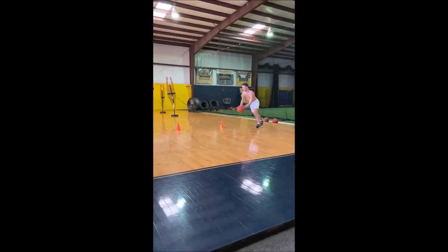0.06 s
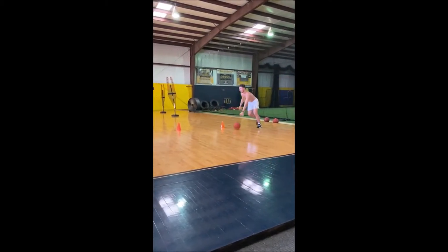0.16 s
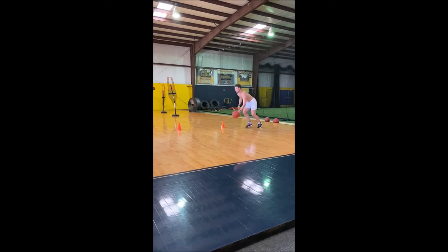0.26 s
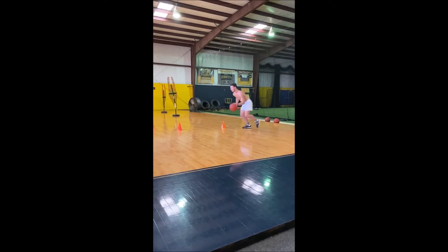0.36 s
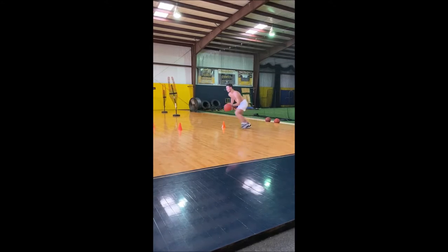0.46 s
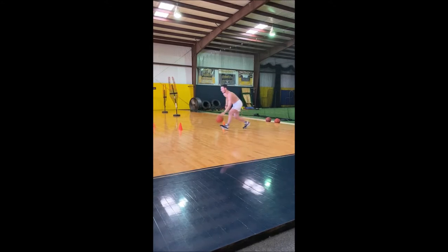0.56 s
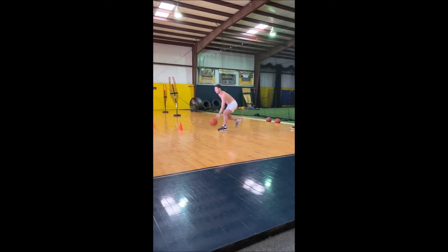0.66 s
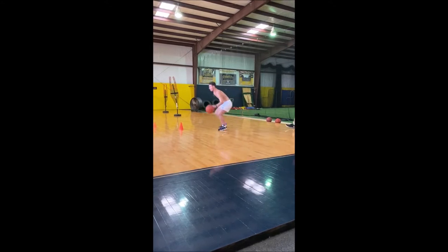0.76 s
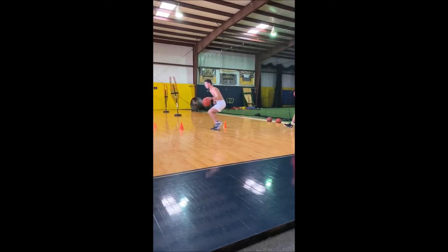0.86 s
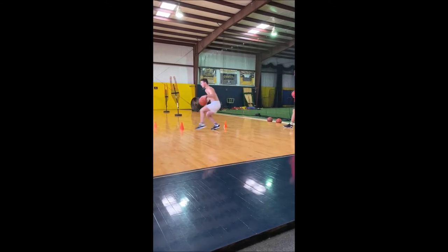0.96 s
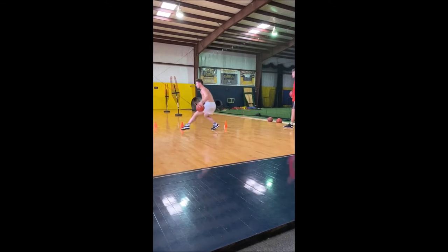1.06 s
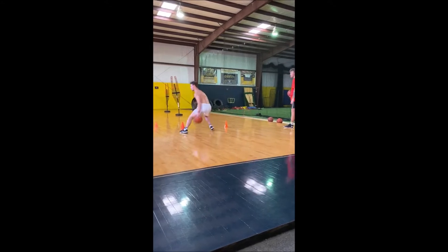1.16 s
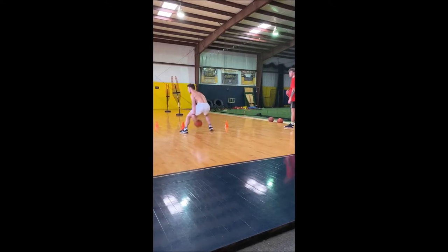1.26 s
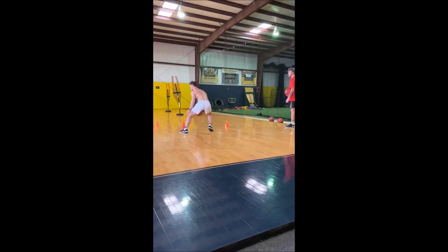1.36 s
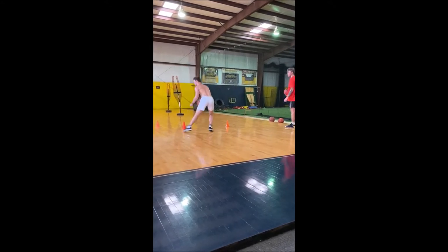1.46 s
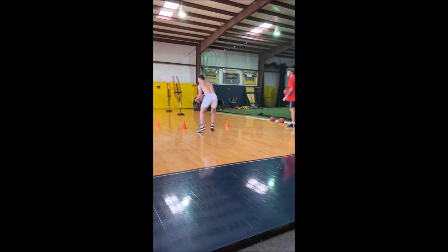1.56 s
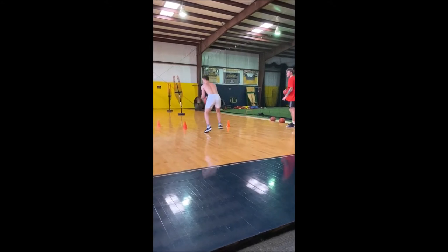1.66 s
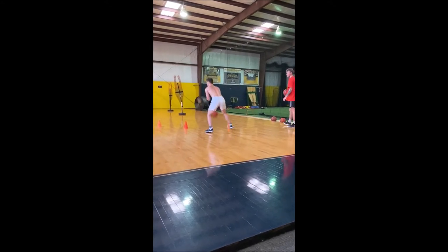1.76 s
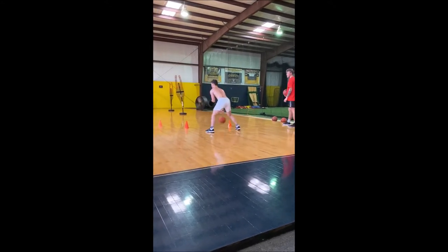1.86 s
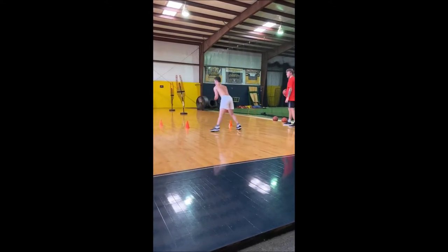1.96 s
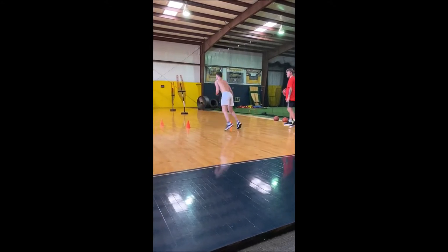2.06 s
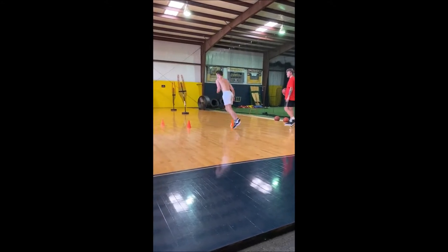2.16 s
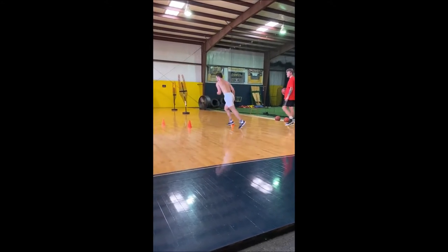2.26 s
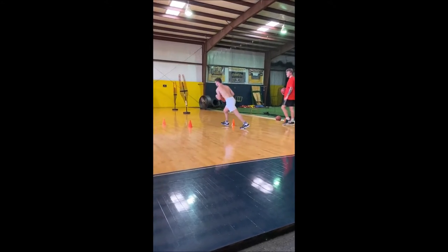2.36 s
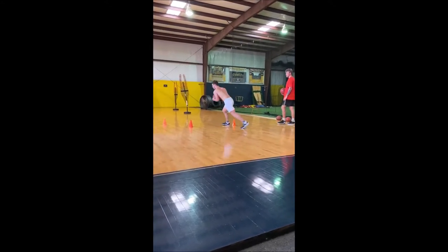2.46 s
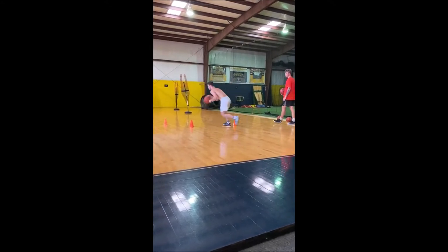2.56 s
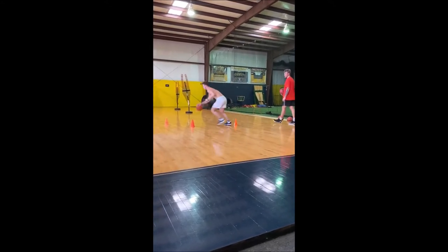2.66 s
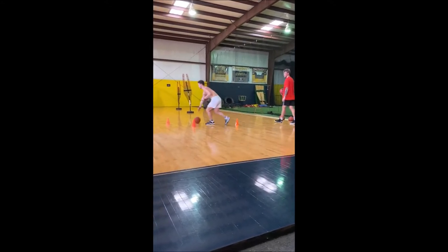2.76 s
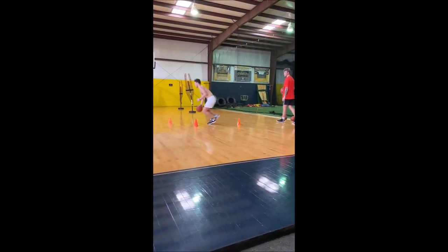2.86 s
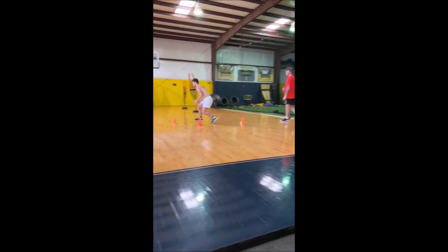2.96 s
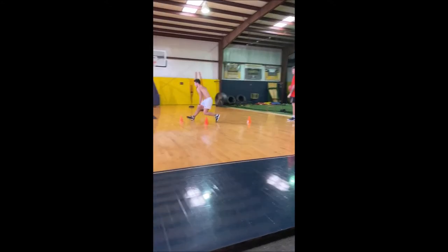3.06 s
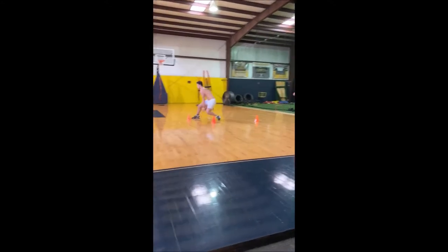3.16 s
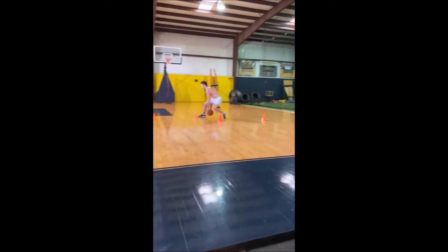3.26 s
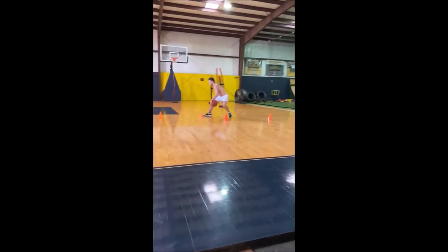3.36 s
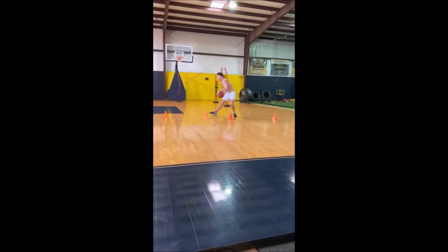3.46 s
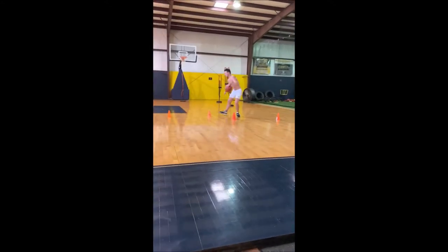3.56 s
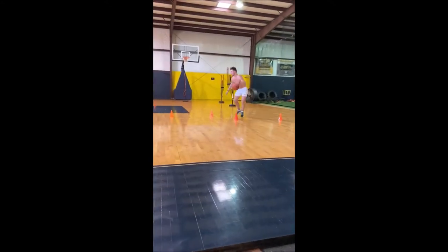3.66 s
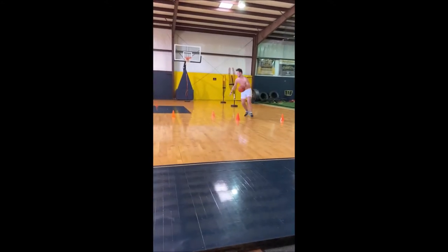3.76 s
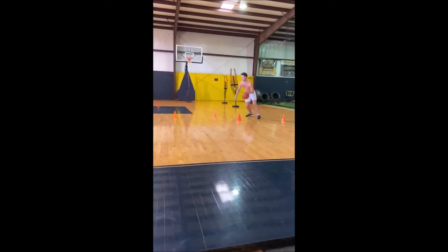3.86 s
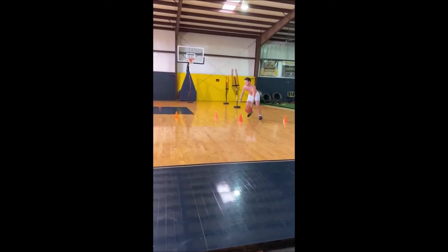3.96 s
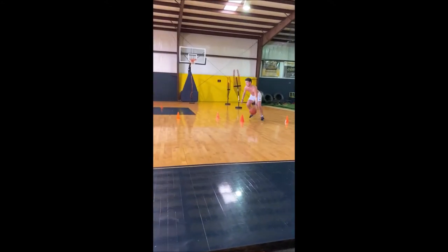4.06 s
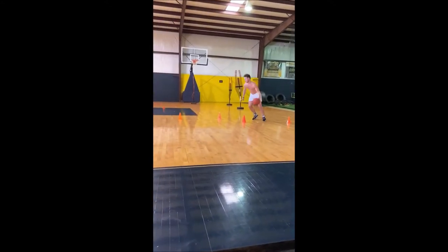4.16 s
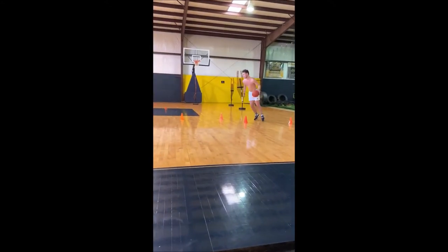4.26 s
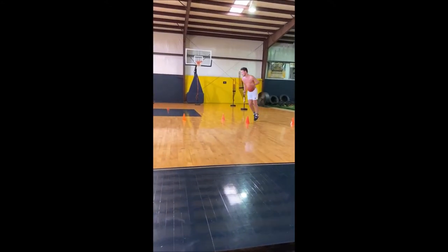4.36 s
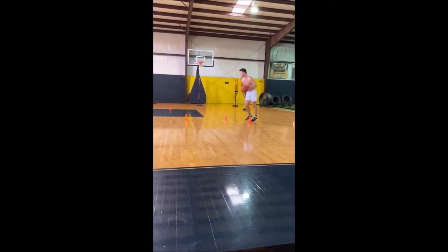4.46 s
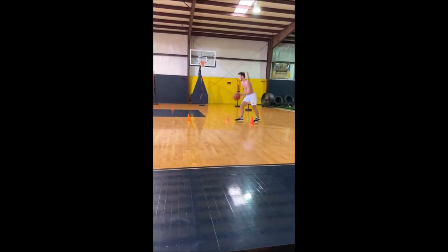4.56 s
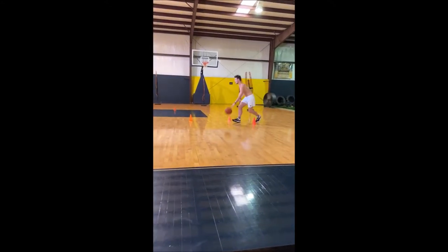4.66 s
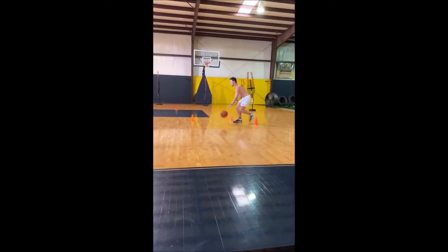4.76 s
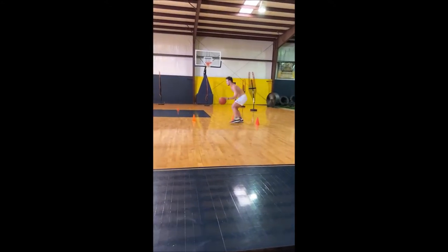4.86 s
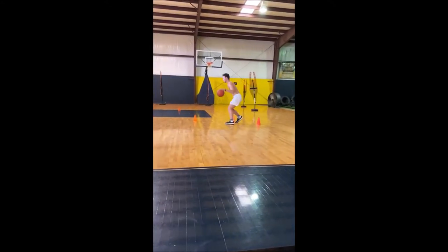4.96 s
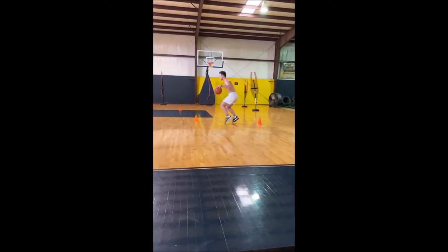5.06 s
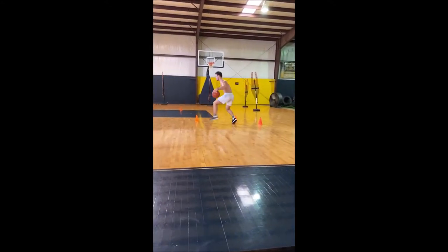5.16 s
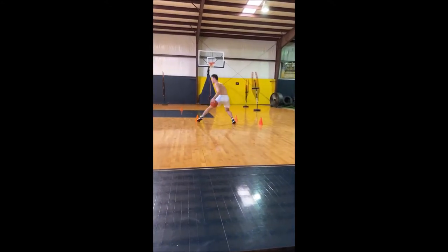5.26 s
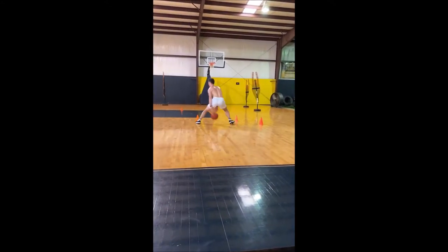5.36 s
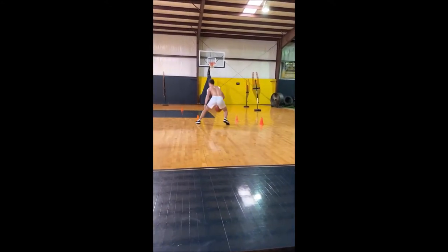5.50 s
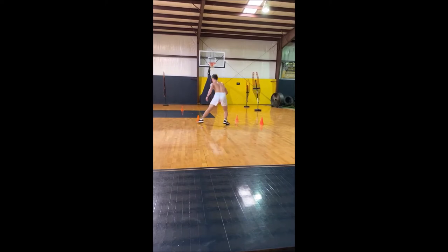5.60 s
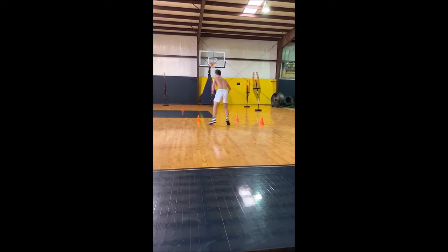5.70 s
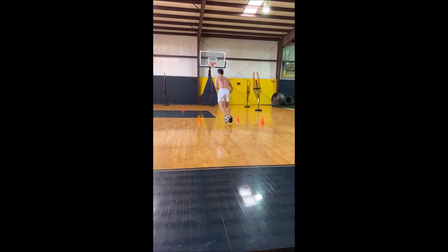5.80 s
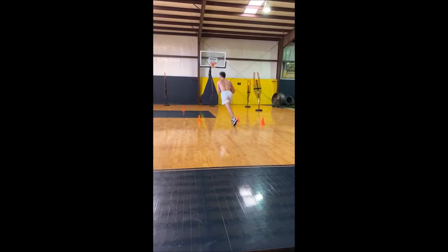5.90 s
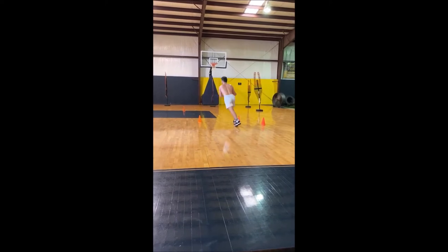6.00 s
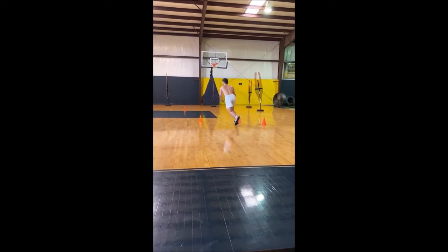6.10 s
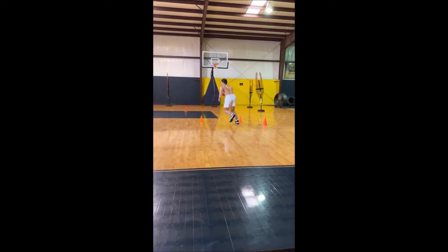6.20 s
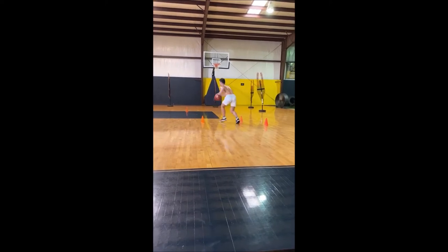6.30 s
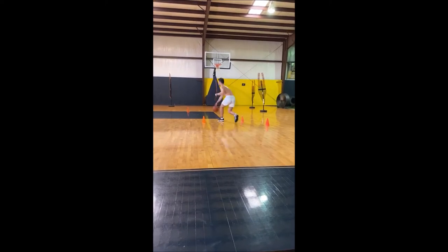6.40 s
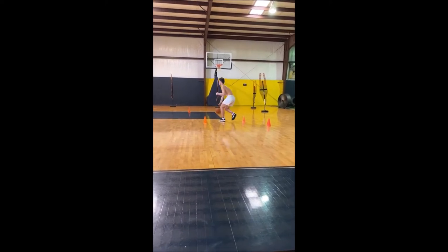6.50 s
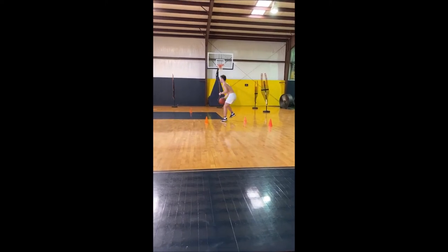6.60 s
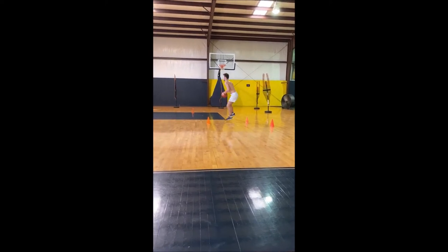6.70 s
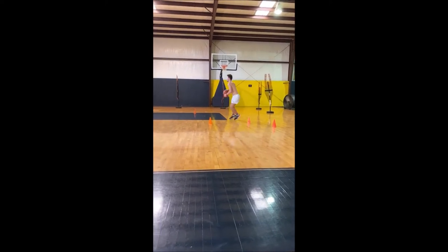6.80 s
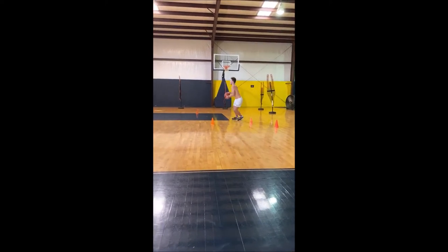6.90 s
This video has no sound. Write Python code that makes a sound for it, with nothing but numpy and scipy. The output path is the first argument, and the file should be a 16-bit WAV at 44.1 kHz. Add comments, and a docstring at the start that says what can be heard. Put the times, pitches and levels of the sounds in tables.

```python
"""Basketball dribble in a gym

A basketball is dribbled on a sprung hardwood court in a large, hard-walled gym.
Each bounce slaps as filtered noise, rings the air in the ball as dying sines, and sends a boom
through the boards as delayed floor modes; rubber soles squeak as short unsteady harmonic tones.
Ventilation rumbles throughout as shaped noise with a hum; walls add echoes and noise-like tails.
A small handheld pair of microphone ports listens from the sideline."""
import sys
import numpy as np
from scipy import signal
from scipy.fft import rfft, irfft, next_fast_len
from scipy.io import wavfile

SR = 44100
rng = np.random.default_rng(int(sys.argv[2]) if len(sys.argv) > 2 else 0)


def int16_out(signal):
    """Quantize to a 16-bit WAV file."""
    q = np.round(np.clip(np.atleast_2d(signal).T, -1, 1) * 32767)
    wavfile.write(sys.argv[1], SR, q.astype(np.int16))


def how_loud(loudness_db):
    """Turn decibels into a plain amplitude multiplier (0 dB gives 1, 20 dB gives 10)."""
    steps = np.asarray(loudness_db, float) / 20
    return 10 ** steps


N = 306036
SIZE = next_fast_len(N + 2 * SR)   # room for the reverberation
HZ = np.arange(SIZE // 2 + 1) * SR / SIZE

# ball on boards: (time [s], slap level [dB], ball ring level [dB], crack level [dB], boom level [dB])
BOUNCE_HITS = [(0.1898, -3, -11, -11, -17), (0.6366, -3.5, -9, -7, -16.5), (1.2499, -7.5, -13.5, -11, -22),
               (1.8526, -6.5, -15.5, -6, -18), (2.7918, -11, -5, -17, -24), (3.119, -12, -23, -23, -18.5),
               (3.261, -13, -15, -15, -21), (4.0356, -9.5, -9, -4.5, -17.5),
               (4.7422, -6.5, -7.5, -10, -17.5), (5.42, -9.5, -9.5, -15.5, -19),
               (6.4788, -6, -11.5, -12, -17)]


def rms_one(x):
    """Scale to unit rms."""
    return x / np.sqrt(np.mean(x ** 2) + 1e-20)


def at_hz(points, hz, axis=1):
    """Read a column of a spectrum on a log-frequency axis."""
    points = np.array(points, float)
    return np.interp(np.log(hz + 1), np.log(points[:, 0] + 1), points[:, axis])


def shaped(x, response):
    """Filter by a frequency response."""
    return irfft(rfft(x, SIZE) * response, SIZE)[..., :N]


def band(x, low_hz, high_hz):
    """Second-order band-pass."""
    sections = signal.butter(2, [low_hz, min(high_hz, .45 * SR)], "band", fs=SR, output="sos")
    return signal.sosfilt(sections, x)


def drift(rate_hz, count=N):
    """Low-passed chance of unit rms, wandering at about the given rate."""
    r = np.exp(-2 * np.pi * rate_hz / SR)
    settle = SR // 4
    wander = signal.lfilter([1], [1, -2 * r, r * r], rng.standard_normal(count + settle))
    return rms_one(wander[settle:])


def clicks(db, late_s=0.):
    """One click a bounce."""
    out = np.zeros(N)
    hit_s = np.array(BOUNCE_HITS)[:, 0] + late_s + .0008
    out[np.round(hit_s * SR).astype(int)] = how_loud(db)
    return out + 1e-18


def ring(x, hz, t60):
    """A unit click sets a sine of height 1 ringing, which dies by 60 dB in t60 seconds."""
    r = how_loud(-60 / (t60 * SR))
    w = 2 * np.pi * hz / SR
    return signal.lfilter([0, np.sin(w)], [1, -2 * r * np.cos(w), r * r], x)


def burst(x, t60, low_hz, high_hz):
    """Each click sets off a puff of noise that dies by 60 dB in t60 seconds."""
    fading = how_loud(-60 * np.arange(SR // 20) / SR / t60)
    envelope = signal.fftconvolve(x, fading)[:N]
    return band(envelope * rng.choice([-1, 1], N), low_hz, high_hz)


def ventilation():
    """Rushing air in two unrelated fields, with one motor hum in both; all wavers together."""
    # spectrum of the rush: (frequency [Hz], level [dB per Hz])
    rush_spectrum = [(30, -70), (45, -51.5), (65, -52), (120, -52.5), (200, -53), (400, -55.5), (1000, -62),
                     (1600, -70), (2500, -76), (4000, -81), (6300, -88), (11000, -99), (13500, -112),
                     (15500, -108)]
    hum_hz, hum_width_hz, hum_db = 60.5, 11, -37
    rush = shaped(rng.standard_normal((2, N)), how_loud(at_hz(rush_spectrum, HZ)) * np.sqrt(SR / 2))
    hum_t60 = np.log(1000) / np.pi / hum_width_hz
    hum = rms_one(ring(rng.standard_normal(N), hum_hz, hum_t60))
    waver_db = 1.03 * drift(0.9)
    return (rush + how_loud(hum_db) * hum) * how_loud(waver_db)


def ball():
    """Crack and slap of skin on wood, then modes of the enclosed air; slap and lowest mode recur at lift-off."""
    # air inside the ball above its lowest mode: (frequency [Hz], relative level [dB], t60 [s])
    upper_modes = [(1350, -2, .014), (1650, 0, .014), (2150, -3, .012), (2750, -6, .010), (4700, -9, .008)]
    lowest_hz, lowest_t60_s = 966, 0.022
    upper_modes_db = -9.5   # below the slap
    lift_off_s = .013   # the skin snaps back as the ball leaves the boards
    slap_back_db, ring_back_db = -9, -4   # at lift-off
    crack_hall_db = -7   # the crack beams along the floor and feeds the hall less

    s, slap_db, ring_db, crack_db = np.transpose(BOUNCE_HITS)[:4]
    crack = burst(clicks(crack_db), t60=.003, low_hz=2500, high_hz=12500)
    slaps = clicks(slap_db) + clicks(slap_db + slap_back_db, lift_off_s)
    out = burst(slaps, t60=0.03, low_hz=640, high_hz=2780)
    low = clicks(ring_db, 0.00108) + clicks(ring_db + ring_back_db, lift_off_s)
    out += ring(low, lowest_hz, lowest_t60_s)
    chance_db = rng.normal(0, 2, (len(s), len(upper_modes)))
    for (hz, level_db, t60), vary_db in zip(upper_modes, chance_db.T):
        out += ring(clicks(slap_db + upper_modes_db + level_db + vary_db), hz, t60)
    return out + crack * how_loud([[0], [crack_hall_db]])   # direct, sent to the hall


def boom():
    """Floor modes carried by bending waves in the boards, where high tones outrun low ones."""
    # sprung floor: (frequency [Hz], signed relative strength, t60 [s])
    floor_modes = [(57.73, 0.87, 0.26), (85.8, -0.2, 0.28), (129, -1.5, 0.033), (197.4, -0.4, 0.13)]
    # delay [s] = bend / sqrt(Hz) - bend_lead_s
    bend, bend_lead_s = .2256, .0124
    floor_gain_db = 86   # boom level to strength of the floor modes
    # a square hit that rings the ball also drives the upper floor modes
    upper_db_at_zero_ring, upper_db_per_ring_db = 4, 0.41

    _, _, ring_db, _, boom_db = np.transpose(BOUNCE_HITS)
    upper_db = boom_db + upper_db_at_zero_ring + upper_db_per_ring_db * ring_db
    deep, upper = rfft([clicks(db + floor_gain_db) for db in (boom_db, upper_db)], SIZE)
    modes = 0
    for hz, strength, t60 in floor_modes:
        drive = deep if hz < 95 else upper
        loss = 1j * HZ * np.log(1000) / np.pi / t60
        modes = modes + drive * strength * hz / (hz ** 2 - HZ ** 2 + loss)
    # the phase whose slope is the delay above
    travel = np.exp(-2j * np.pi * (2 * bend * np.sqrt(HZ) - bend_lead_s * HZ))
    damping = 1 / (1 + (HZ / 330) ** 8)
    return irfft(modes * travel * damping, SIZE)[:N]


def soles():
    """Stick-slip of rubber: a tone with harmonics; roughness makes slip rate and force unsteady."""
    # a squeak is one slip or a run of slips:
    # (time [s], slip rate [Hz], level [dB], roughness [0-1], 2nd over 1st harmonic [dB])
    slips = [(0.318, 3300, -20.5, 0.52, -8), (.825, 4350, -17.5, 0.75, -10.5), (.835, 3950, -22.5, .8, -4),
             (0.846, 4160, -18, 0.75, -11), (1.387, 4670, -16, 0.2, -39), (1.406, 5050, -25.5, .06, -30),
             (2.767, 4010, -24.5, 0.48, -20), (3.151, 4820, -38, 0.2, -26), (3.868, 4500, -29.5, 0.2, -13),
             (4.917, 4450, -26, .8, -4), (4.92, 3320, -20.5, 0.18, 4.5), (4.927, 4360, -20, 0.58, -11),
             (4.933, 3400, -17.5, .25, -11), (4.939, 4140, -20.5, .6, -12), (4.953, 4450, -18, 0.07, -17),
             (4.963, 4500, -20, 0.1, -27), (6.356, 3770, -27.5, 0.1, -1), (6.373, 3900, -18.5, 0.3, -14),
             (6.384, 3750, -22.5, 0.04, -5), (6.448, 4100, -28, .5, -6), (6.463, 4340, -25.5, 0.62, -18)]
    # overtones and hall share, set per slip rate; the squeaks near 4.6-5 kHz are from a shoe close to
    # the microphone, so sound dry:
    # (slip rate [Hz], 3rd over 2nd harmonic [dB], hall share over direct sound [dB])
    tread = [(3300, -10, 1.5), (3770, -8.5, 3.5), (3950, -10, 3.5), (4500, -19, 0.5), (4600, -4, -20),
             (4750, -8, -20), (5050, -8, -8)]
    # neighbouring treads slip at nearby rates: (share of the slip rate)
    strands = (0.881, 0.941, 1.06, 1.12)
    slip_s, attack_s, release_s = 0.012, 0.0022, 0.0039
    glide_per_s = 1.2   # the slip rate climbs at this share of itself a second
    fade_db_per_s = -250   # the grip slackens through a slip

    out = np.zeros((2, N))   # direct, sent to the hall
    count = SR // 40
    t = np.arange(count) / SR
    rise_and_release = np.minimum(t / attack_s, 1 + (slip_s - t) / release_s)
    envelope = np.clip(rise_and_release, 0, 1) * how_loud(fade_db_per_s * t)
    for s, hz, db, rough, second_db in slips:
        third_db = second_db + at_hz(tread, hz)
        hall_db = at_hz(tread, hz, axis=2)
        rate = hz * (1 + glide_per_s * (t - slip_s / 2))
        jitter = .12 * rough * np.tanh(drift(500, count=count))
        turn = 2 * np.pi * np.cumsum(rate * (1 + jitter)) / SR
        force = how_loud(db + 8 * rough * np.tanh(drift(300, count=count))) * envelope
        tone = np.sin(turn) + how_loud(second_db) * np.sin(2 * turn)
        tone += how_loud(third_db) * (np.sin(3 * turn) + 0.27 * np.sin(4 * turn))
        # the sole also scuffs
        tone += how_loud(-8.5) * rough * band(rng.standard_normal(count), 1530, 8600)
        for share in strands:
            tone += 0.27 * rough * np.sin(share * turn) * drift(120, count=count)
        start = round(s * SR)
        out[:, start:start + count] += force * tone * how_loud([[0], [hall_db]])
    return out


def wall_echoes(x):
    """Delayed copies from roof and walls, which return less treble."""
    # single reflections: (delay [s], level [dB])
    reflections = [(0.022, -14), (.031, -38), (.067, -14.5), (0.085, -20)]
    arrivals = sum(how_loud(db) * np.exp(-2j * np.pi * HZ * s) for s, db in reflections)
    echoes = shaped(x, arrivals / (1 + (HZ / 9300) ** 2))
    rise_db_per_s = 1   # play drifts towards the far wall, so its echoes grow
    return echoes * how_loud(rise_db_per_s * (np.arange(N) - N / 2) / SR)


def hall(x):
    """Two unrelated tails of noise, each half-octave dying at its own rate."""
    # gym reverberation: (frequency [Hz], t60 [s], relative level [dB])
    decay = [(61, 0.72, -1), (200, 0.7, 1), (695, 1.5, -7), (1967, 0.96, -4), (4500, 1.3, -0.5),
             (8740, 0.81, -6), (16000, 1.1, -5)]
    build_up_s = .011   # reflections thicken over the first 20 ms
    t = np.arange(2 * SR) / SR
    edges = 30 * 2 ** np.arange(0, 9.6, .5)
    white = rng.standard_normal((2, 2, len(t)))   # neighbouring bands take turns
    tails = 0
    for k, (low, high) in enumerate(zip(edges, edges[1:])):
        hz = np.sqrt(low * high)
        t60 = at_hz(decay, hz)
        fading = how_loud(at_hz(decay, hz, axis=2) - 60 * t / t60)
        tails = tails + band(white[k % 2], low, high) * fading / np.sqrt(t60 * SR / 14)
    build_up = 1 - np.exp(-(t / build_up_s) ** 2)
    return shaped(x, rfft(tails * build_up, SIZE))


def scene():
    """Direct sound and echoes reach both ports alike; diffuse sound only partly."""
    # diffuse sound at the two ports: (frequency [Hz], likeness [0-1])
    likeness = [(170, .99), (350, 0.95), (440, 0.89), (560, 0), (900, 0.77), (1700, 0.05), (2600, 0),
                (3600, 0.02), (5500, 1), (7200, 1), (8800, 0.4), (10400, 0.65), (12000, 0.1), (13100, 0.31),
                (16000, .75)]
    hit, hit_sent = ball()
    squeak, squeak_sent = soles()
    floor = boom()
    echoes = wall_echoes(hit + squeak_sent)
    shared, apart = hall(hit_sent + squeak_sent + floor) + ventilation()
    alike = np.clip(at_hz(likeness, HZ), 0, 1)
    second_port = shaped(shared, alike) + shaped(apart, np.sqrt(1 - alike ** 2))
    return hit + squeak + floor + echoes + np.array([shared, second_port])


def roll_off(x):
    """The treble ends steeply here."""
    return signal.sosfilt(signal.butter(12, 17170, fs=SR, output="sos"), x)


def record(dry):
    """The right port hears later and, around 1 kHz, more weakly; peaks are rounded, rumble and top are cut."""
    # level between the ports: (frequency [Hz], left minus right [dB])
    left_gain = [(60, 0.0), (110, 0.0), (200, 1.0), (380, 2.0), (700, 6.5), (1290, 4.5), (2380, 0.0),
                 (4400, 0.0), (8120, 0.0), (15000, 0.0)]
    # phase between the ports: (frequency [Hz], left ahead of right [radians])
    left_lead = [(0, 0), (350, .1), (700, 1.4), (950, 1), (1700, .7), (2500, 1.9), (3300, 1.8), (3800, .7),
                 (4600, 1.5), (5500, 1), (10300, 6.25), (13100, 9.4), (14400, 9.7), (16700, 13)]
    rumble_cut_hz, top_hz = 45, 16700
    lead = np.interp(HZ, *np.transpose(left_lead))
    right = how_loud(-at_hz(left_gain, HZ)) * np.exp(-1j * lead)
    passband = (HZ < top_hz) / (1 + (rumble_cut_hz / (HZ + 1)) ** 6)
    ports = shaped(dry, np.array([np.ones_like(right), right]) * passband)
    rounded = .9 * np.tanh(ports / 0.92)
    return roll_off(rounded)


dry = scene()
out = record(dry)
int16_out(out)
```